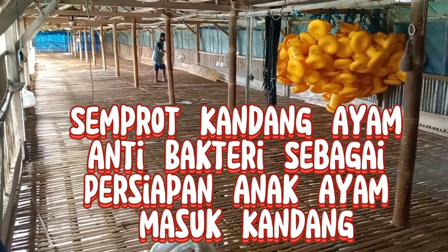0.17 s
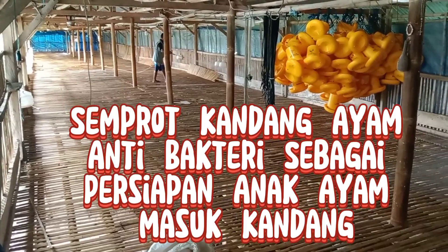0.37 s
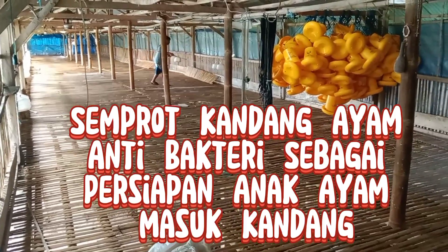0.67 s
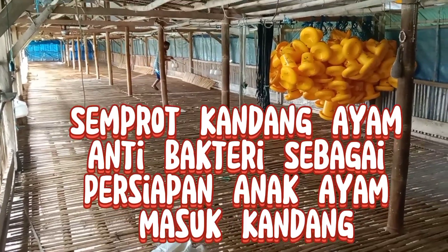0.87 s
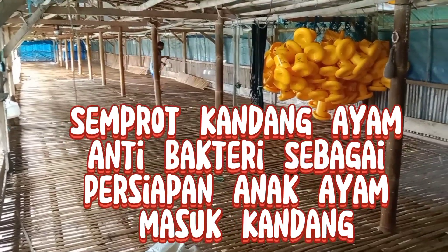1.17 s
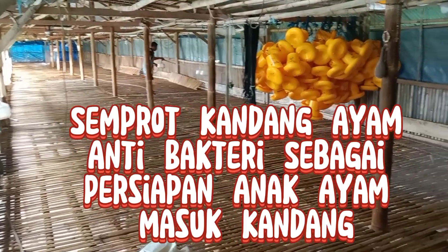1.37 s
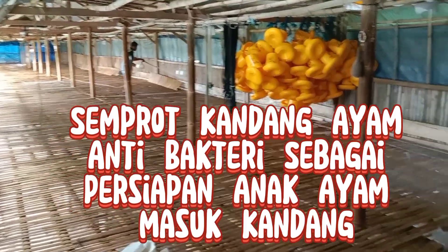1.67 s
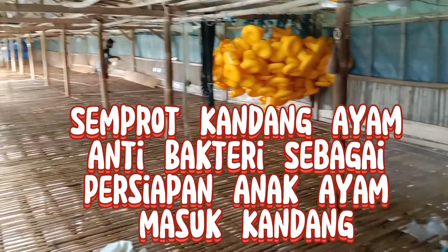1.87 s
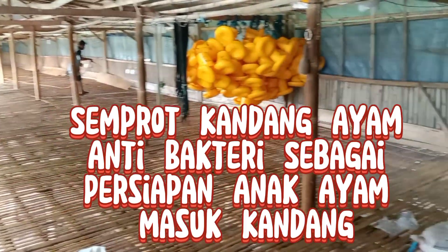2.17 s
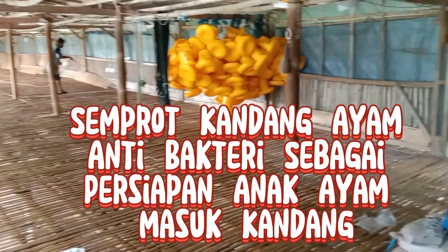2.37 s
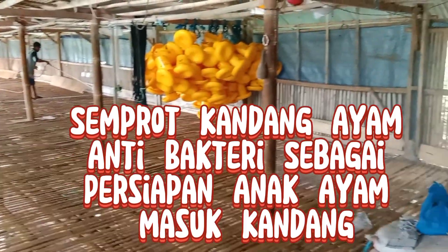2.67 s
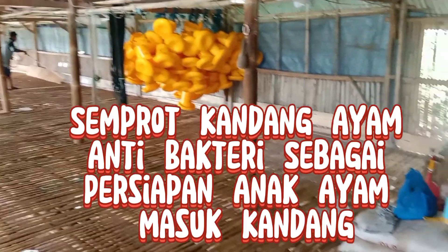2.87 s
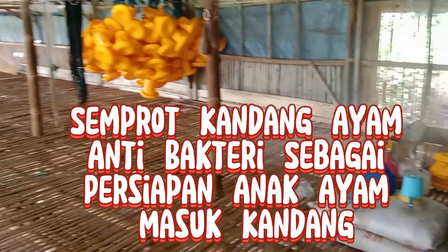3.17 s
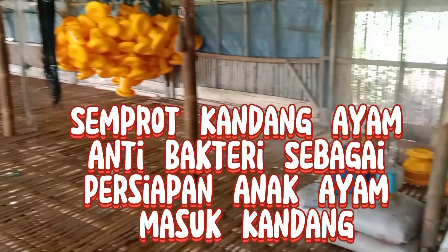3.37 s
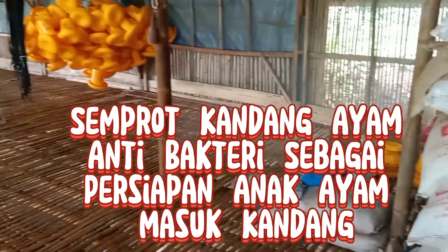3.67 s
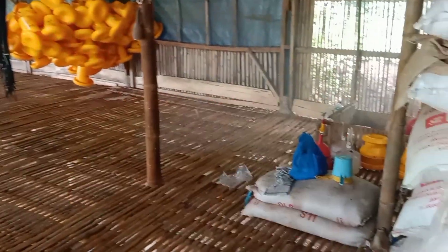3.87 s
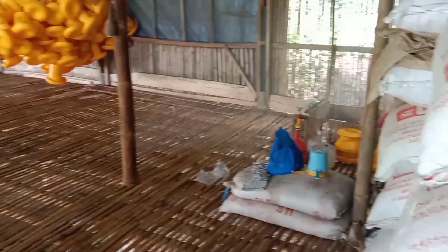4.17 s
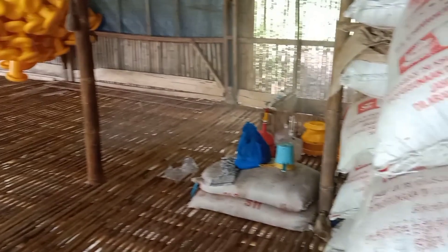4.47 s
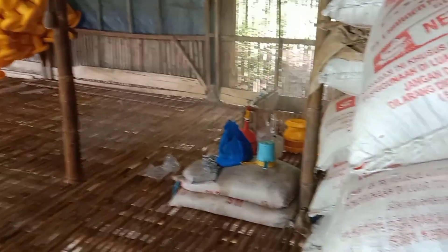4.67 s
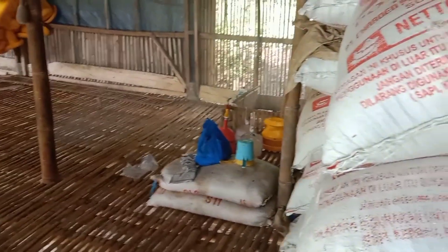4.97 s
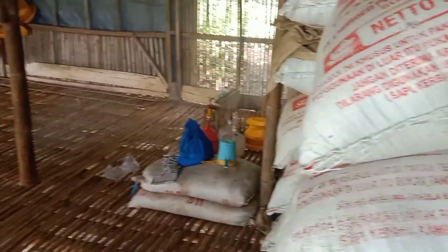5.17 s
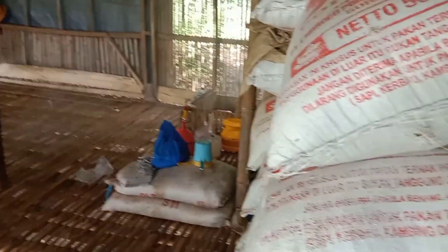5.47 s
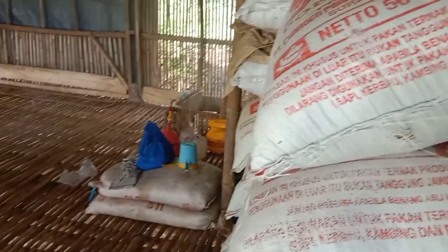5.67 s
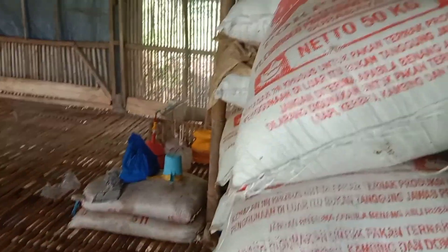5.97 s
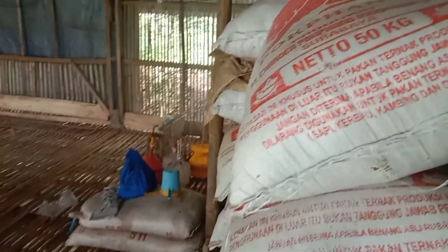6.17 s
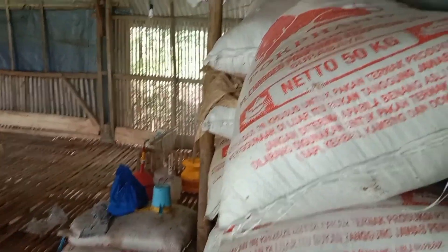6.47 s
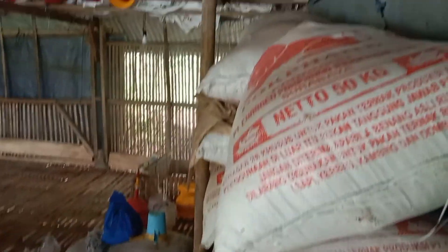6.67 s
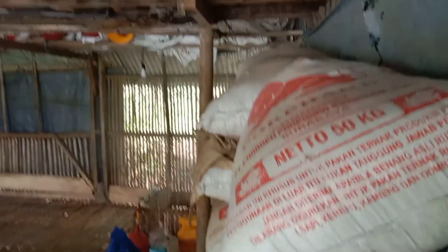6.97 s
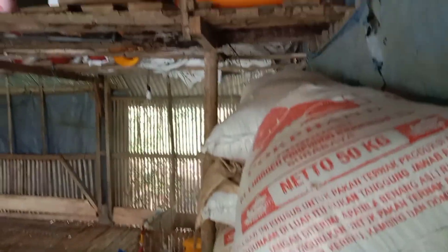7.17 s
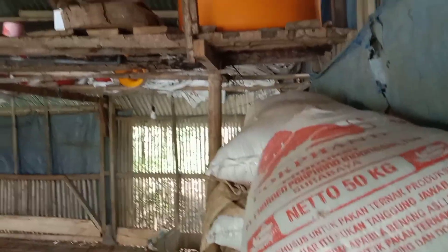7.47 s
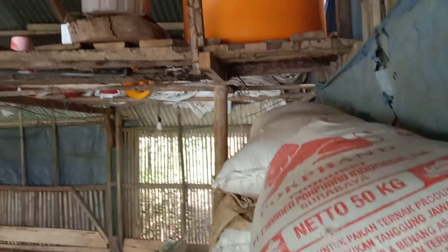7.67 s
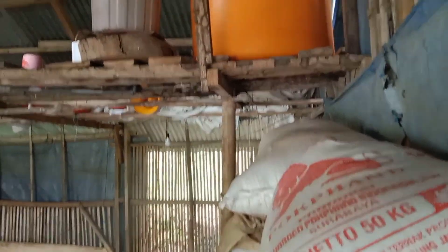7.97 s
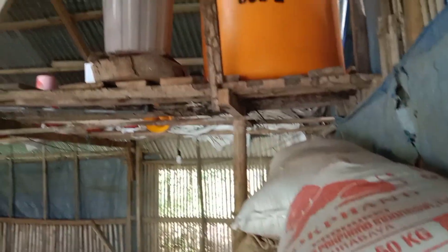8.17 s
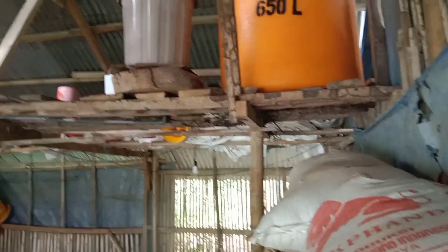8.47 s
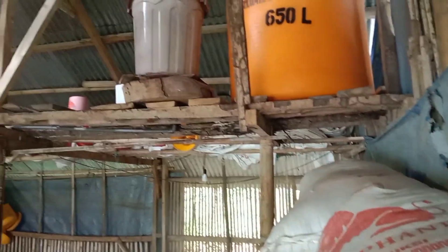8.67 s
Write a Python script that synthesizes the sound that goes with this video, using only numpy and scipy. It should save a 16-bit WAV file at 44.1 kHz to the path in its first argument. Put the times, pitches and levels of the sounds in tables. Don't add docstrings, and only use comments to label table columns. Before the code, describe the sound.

A continuous bright water hiss fills a phone's single microphone, spotted with irregular hollow gurgles as the spray crosses bamboo canes. Early on comes a brief grainy scrape of a plastic sack close by, with low slat creaks around it. Midway there are tiny sharp drop ticks, then one dull knock underfoot. The hiss turns mistier and the hollow notes weaken, over a barely audible rapid engine in an open shed with a short tail.

```python
import sys
import numpy as np
from scipy import signal
from scipy.fft import rfft, irfft, next_fast_len
from scipy.io import wavfile
from scipy.ndimage import uniform_filter1d, map_coordinates

SR = 44100
rng = np.random.default_rng(int(sys.argv[2]) if len(sys.argv) > 2 else 0)


def store_wav(level_fs):
    pcm = np.round(np.clip(np.atleast_2d(level_fs), -1, 1) * 32767)
    wavfile.write(sys.argv[1], SR, pcm.T.astype(np.int16))


def invert_db(x):
    u = np.asarray(x, float) / 20
    return 10 ** u


N = 388080

# time in seconds, hiss level in dB.
JET = [(0, -30.5), (.55, -29.5), (.86, -28), (1.15, -29.5), (1.5, -27), (1.68, -28), (1.92, -29.5),
       (2.15, -29), (3.1, -28.5), (3.55, -31), (3.85, -27), (4.2, -31), (4.9, -29), (6, -29.5), (6.5, -29),
       (7.4, -27), (8.8, -27)]
# start in seconds, length in seconds, hiss level in dB.
FLICKS = [
    (.582, 0.05, -30.5),
    (1.598, 0.012, -23),
    (1.64, 0.16, -32.5),
    (3.99, 0.024, -31),
]
# frequency in Hz, density in dB per Hz.
FAR_HISS = [(1150, -28), (2000, -19), (2270, -1.5), (2410, -0.5), (3010, 2), (3970, -12), (4580, 1),
            (5100, 0.5), (5850, -4), (6190, -22.5), (6740, -19), (7340, -69), (7600, -47), (9880, -62),
            (16700, -120)]
# frequency in Hz, density in dB per Hz.
NEAR_HISS = [(1150, -22), (2000, -25), (2290, -5), (3180, 0.5), (3610, -1), (3990, -9), (4740, -2.5),
             (5070, -0.5), (7600, -24.5), (9880, -59), (16700, -120)]
# time in seconds, share of the nearer hiss from 0 to 1.
TURN = [(3.3, 0.6), (4, 0.66), (6.5, 0.8), (7.6, 1)]
# frequency in Hz, density in dB per Hz.
MIST = [(6500, -32), (7400, -7.5), (8200, -1), (10000, 2), (10900, -5.5), (11800, -60), (14000, -37)]
# frequency in Hz, density in dB per Hz.
FINE = [(9500, -9), (11200, -4), (12500, -11), (14000, -21.5), (15500, -21)]
# start in seconds, length in seconds, level in dB re hiss.
DRIFTS = [(.565, .03, -39), (1.6, .05, -42), (1.93, .045, -35), (2.8, 0.27, -38), (3.72, .1, -35),
          (3.84, 0.08, -25), (3.98, .07, -25), (4.06, .06, -31), (4.2, 0.098, -26), (4.28, .09, -25),
          (4.46, .05, -27), (4.56, .2, -25), (4.85, .13, -26), (5.02, .21, -27), (5.28, 0.39, -26.5),
          (5.7, .06, -26), (5.8, .03, -28), (5.87, 0.23, -25.5), (6.13, 0.2, -26.5), (6.37, 0.3, -26),
          (6.72, 0.52, -26.5), (7.27, .11, -27), (7.42, 0.93, -25.5), (8.41, .33, -27), (8.78, .05, -27)]
# time in seconds, peak level in dB.
DROPS = [
    (3.8385, -30),
    (3.8415, -36),
    (4.0018, -44),
]

# start in seconds, length in seconds, level in dB, cavity note in Hz.
THICK = [(.198, 0.025, -36, 1050), (.44, 0.047, -47.5, 1050), (.622, 0.039, -33, 1048),
         (.84, 0.023, -29, 1027), (1.09, 0.035, -35.5, 960), (1.495, 0.065, -32, 1024),
         (1.71, 0.062, -33, 1069), (2.088, 0.12, -29.5, 1038), (2.37, 0.02, -31.5, 1043),
         (2.52, 0.044, -37, 1090), (2.72, 0.1, -41.5, 1095), (2.96, 0.036, -34.5, 1038),
         (3.172, 0.052, -32.5, 1038), (3.385, 0.083, -34, 1052), (3.608, 0.043, -27, 1060),
         (3.83, 0.07, -37.5, 1065), (4.412, 0.082, -40.5, 1083), (4.873, 0.03, -36.5, 1017),
         (5.07, 0.082, -35.5, 1048), (5.325, 0.034, -33.5, 1010), (5.51, 0.067, -29.5, 1040),
         (5.735, 0.089, -35.5, 1040), (6.12, 0.14, -36, 1092), (6.783, 0.065, -37.5, 1020),
         (7.0, 0.1, -46, 1052), (7.23, 0.054, -40, 1050), (7.415, 0.088, -34, 1040),
         (7.795, 0.077, -33, 1075), (8.072, 0.048, -43, 1096), (7.9, 0.082, -44.5, 960),
         (8.62, 0.062, -46, 980), (8.7, 0.1, -42, 1052),
         (0.707, 0.057, -40, 1095), (0.911, 0.13, -41, 1070), (1.052, 0.029, -36, 1105),
          (1.184, 0.048, -36, 1128), (1.591, 0.11, -34, 1145), (1.787, 0.023, -36.5, 1140),
          (1.853, 0.065, -36.5, 1153), (2.305, 0.045, -38.5, 1208), (3.094, 0.022, -37, 1166),
          (3.295, 0.049, -38.5, 1156), (3.53, 0.018, -31.5, 1134), (3.959, 0.054, -37, 1116),
          (4.072, 0.033, -40, 1166), (4.181, 0.14, -35.5, 1153), (4.647, 0.032, -36.5, 1153),
          (5.434, 0.056, -37, 1148), (6.017, 0.036, -50, 1224), (6.362, 0.05, -44, 1170),
          (6.457, .03, -46, 1160), (6.552, 0.026, -39, 1117), (7.597, .05, -48, 1140),
          (7.89, 0.057, -44.5, 1050), (8.231, 0.07, -42, 1086), (8.43, 0.051, -48, 1194)]
# frequency in Hz, gain in dB.
CANE_GAIN = [(780, -22), (850, -4), (930, -1.5), (1000, -1), (1400, -0.5)]
# start in seconds, length in seconds, level in dB, cavity note in Hz, glide in Hz per s.
THIN = [(0.43, 0.15, -52, 1414, -300), (.7, 0.084, -48, 1420, 2500), (.831, .06, -39.5, 1270, -200),
        (0.972, 0.046, -39.5, 1393, 1800), (1.17, 0.036, -40, 1420, 800), (1.49, 0.046, -44, 1380, -1500),
        (1.577, 0.15, -43.5, 1406, -200), (2.087, 0.035, -44, 1340, -1500),
        (2.269, 0.087, -46, 1334, -3000), (2.682, .1, -49, 1500, -1000), (3.08, .06, -48, 1384, 300),
        (3.18, .03, -46, 1380, -500), (3.29, 0.094, -46, 1322, 900), (3.519, .05, -40.5, 1290, 1500),
        (3.598, 0.13, -44, 1316, -900), (3.973, 0.067, -45.5, 1345, -800), (4.12, .14, -47, 1355, 900),
        (4.27, 0.094, -53.5, 1380, -900), (4.408, .05, -49, 1400, -800), (4.517, 0.068, -47, 1380, 500),
        (4.646, .07, -46, 1303, -2500), (4.79, .12, -42, 1423, -100), (5.004, .12, -45.5, 1412, -1800),
        (5.223, 0.053, -41, 1380, -400), (5.3, 0.21, -42.5, 1270, -500), (5.366, 0.055, -42.5, 1450, 2000),
        (5.709, 0.094, -43, 1414, -300), (5.925, 0.18, -48, 1317, -900), (6.15, 0.14, -43, 1290, 1500),
        (6.343, .033, -42, 1416, -200), (6.44, 0.088, -43, 1418, 2202), (6.55, .05, -50.5, 1325, -2000),
        (6.677, .035, -39.5, 1480, 2500), (6.755, .07, -47, 1400, -1800), (6.873, 0.063, -42.5, 1317, 1200),
        (7.06, .17, -46, 1386, -500), (7.34, .09, -43.5, 1360, -3000), (7.581, 0.028, -44, 1350, 500),
        (7.806, .1, -48, 1270, -1200), (8.304, 0.15, -53, 1310, -900)]
# start in seconds, length in seconds, level in dB, slat note in Hz.
SPLASHES = [(.1, 0.82, -48, 1592), (.835, 0.026, -38.5, 1810), (.9, 0.31, -44, 1663),
            (1.47, 0.31, -40.5, 1705), (1.8, 0.16, -47, 1620), (2.13, 0.044, -40.5, 1910),
            (2.22, .12, -45, 1720), (2.7, 0.06, -52, 1640), (3.18, 0.058, -46, 1790),
            (3.4, 0.098, -47, 2000), (3.59, 0.047, -43, 1850), (3.82, 0.08, -40.5, 1860),
            (3.98, 0.06, -47, 1650), (4.28, 0.051, -45, 1780), (4.55, 0.16, -44, 1695),
            (4.78, 0.14, -45, 1665), (4.98, .05, -47, 1566), (5.27, 0.11, -48, 1620),
            (5.5, 0.056, -41.5, 1940), (5.7, 0.095, -41.5, 1610), (6.0, 0.18, -49, 1576),
            (6.3, 0.04, -51, 1710), (6.45, 0.032, -47, 1830), (6.7, 0.083, -44, 1660),
            (7.0, 0.048, -49.5, 1790), (7.18, 0.085, -45.5, 1710), (7.44, 0.033, -48, 1820),
            (7.58, 0.14, -46, 1750), (7.79, 0.13, -39, 1720), (7.95, 0.31, -44.5, 1724),
            (8.36, 0.42, -46.5, 1720)]
# frequency in Hz, density in dB per Hz.
SLATS = [(1400, -7), (1560, -2.5), (1750, -4), (2000, -1), (2200, -2)]

# start in seconds, length in seconds, body level in dB, weave rasp level in dB.
STROKES = [
    (1.212, .015, -34.5, -32),
    (1.243, 0.012, -20.5, -17.5),
    (1.258, 0.02, -20.5, -15.5),
    (1.318, .01, -27, -27),
    (1.378, 0.027, -30, -32),
]
# frequency in Hz, density in dB per Hz.
SACK = [(88, -75), (150, -35.5), (310, -15.5), (754, -14.5), (1160, -4.5), (1280, -13), (1430, -13.5),
        (2000, -29), (2600, -39), (4400, -120)]
# frequency in Hz, density in dB per Hz.
WEAVE = [(880, -40), (1500, 3), (1630, -3.5), (2300, 1.5), (3060, 2.5), (3800, -8.5), (4870, 0.5),
         (5530, -6.5), (7240, -28.5), (10000, -40), (12500, -66), (19800, -120)]
# resonance in Hz, width in Hz, level in dB.
POCKETS = [(334, 40, -12), (538, 33, -9), (1010, 39, 8), (1140, 63, 0), (1480, 70, -6), (1750, 40, -7),
           (1940, 30, -8), (2120, 32, -17)]
# start in seconds, peak in dB, ring in Hz, rise in seconds, t60 in seconds.
CREAKS = [(0.099, -45, 401, 0.023, 0.25), (0.442, -37, 380, 0.017, 0.27), (0.949, -41, 428, 0.03, 0.3),
          (1.064, -38.5, 442, 0.034, 0.28), (1.147, -32, 460, 0.016, 0.19),
          (1.385, -26.5, 326, 0.017, 0.13), (1.535, -43, 430, 0.02, 0.15), (1.603, -38, 350, 0.013, 0.13),
          (1.745, -42, 467, 0.019, 0.16), (.72, -50, 800, 0.053, 0.57), (1.0, -47, 785, 0.034, 0.53),
          (1.5, -44, 804, .03, 0.33), (1.7, -45, 834, 0.047, 0.45), (.85, -46, 303, .02, 0.17),
          (3.984, -38, 406, 0.03, 0.19), (4.884, -38, 570, 0.006, 0.15), (4.95, -48, 600, 0.017, 0.18),
          (5.549, -46, 500, 0.027, 0.21), (7.419, -39, 780, 0.016, 0.15)]
# time in seconds, peak level in dB.
KNOCK = [
    (4.8774, -19),
]

# time in seconds, lead over a steady pace in firings.
LEAD = [(0, .33), (1.4, .345), (2, .355), (2.6, .385), (3.2, .4), (3.8, .358), (4.4, .285), (5, .232),
        (5.6, .266), (6.2, .195), (6.8, .239), (7.4, .234), (8, .304), (8.8, .22)]
# resonance in Hz, width in Hz, level in dB.
EXHAUST = [(68, 4.6, -11.5), (111.3, 25.3, 3), (135, 46, -2), (310, 120, -19)]
# frequency in Hz, density in dB per Hz.
AIR = [(25, -16), (60, -9), (150, -7.5), (250, -7.5), (500, -11), (850, -10), (1100, 1.5), (1500, -3.5),
       (2200, -16)]
# frequency in Hz, density in dB per Hz.
SELF = [(9000, -10), (11000, -4), (15500, 3)]


def spray():
    flick_db = swells(FLICKS, rise_db_s=800, fall_db_s=250)[0]
    hiss_db = 10 * np.log10(invert_db(2 * curves(JET)[0]) + invert_db(2 * flick_db))
    pump_db = 0.36 * np.cos(2 * np.pi * (crank() - 0.1))
    hiss_db = hiss_db + pump_db + 0.5 * wobble(25) + 0.17 * wobble(8)
    fine_db = swells(DRIFTS, rise_db_s=300, fall_db_s=250, rest_db=-44.5)[0]

    near = np.clip(curves(TURN)[0], 0, 1)
    hiss = np.sqrt(1 - near) * rush(FAR_HISS, patchy_db=1.1)
    hiss = hiss + np.sqrt(near) * rush(NEAR_HISS, patchy_db=0.9)

    far_mist_db, near_mist_db = -26.5, -22.5
    steady_db = far_mist_db + (near_mist_db - far_mist_db) * near
    cloud = np.hypot(invert_db(steady_db), invert_db(fine_db - 3))
    mist = cloud * rush(MIST, patchy_db=1.0)
    fine = invert_db(fine_db + 1.8 * wobble(20)) * rush(FINE, patchy_db=2.0)
    return invert_db(hiss_db) * (hiss + mist + fine) + drops()


def drops():
    out, t = np.zeros(N), np.arange(SR // 10) / SR
    for s, db in DROPS:
        tick = np.sin(2 * np.pi * 11000 * t + 1.1 * rng.standard_normal(len(t)))
        out[round(s * SR):][:len(t)] += invert_db(db - 3 - 60 * t / 0.012) * tick
    return out


def thick_canes():
    thick_db, thick_hz = swells(THICK, rise_db_s=1100, fall_db_s=476, rest_db=-60.5, rest_hz=1187,
                                sag_hz_s=394, droop_db_s=41)
    f, db = np.transpose(CANE_GAIN)
    low = gurgle(1.01 * thick_hz, count=1200, spread=0.041, cycles=23.5, fall=0.15)
    low = filtered(low, lambda hz: invert_db(np.interp(hz, f, db)))
    octave = gurgle(2.2 * thick_hz, count=1100, spread=0.076, cycles=36, fall=0.012)
    under = gurgle(0.52 * thick_hz, count=300, spread=0.019, cycles=23.2, fall=0.023)
    return invert_db(thick_db) * (low + invert_db(-7.5) * octave + invert_db(-33) * under)


def thin_canes():
    murmur_db = -56.5
    thin_db, thin_hz = swells(THIN, rise_db_s=450, fall_db_s=550, rest_db=murmur_db, rest_hz=1380,
                              sag_hz_s=-np.array(THIN)[:, -1:])
    thin_db = thin_db + 2.6 * wobble(14)
    looseness = invert_db(2 * (murmur_db - thin_db))
    thin_hz = thin_hz * np.exp(0.079 * looseness * wobble(7.7))
    tones = gurgle(thin_hz, count=600, spread=0.025, cycles=36, fall=0.033)

    splash_db, slat_hz = swells(SPLASHES, rise_db_s=348, fall_db_s=254, rest_db=-55, rest_hz=1613)
    slat_hz = slat_hz * np.exp(0.0472 * wobble(8))
    slats = gurgle(slat_hz, count=750, spread=0.021, cycles=44.3, fall=0.028)
    splash = invert_db(-3.0) * slats + invert_db(-1.5) * rush(SLATS, patchy_db=5)

    stroke_db = 1.7 * np.cos(2 * np.pi * (crank() - 0.15))
    return invert_db(stroke_db) * (invert_db(thin_db) * tones + invert_db(splash_db) * splash)


def gurgle(note_hz, count, spread, cycles, fall):
    start = ((np.arange(count) + rng.random(count)) * (N / count)).astype(int)
    steps = np.arange(int(1.15 * SR * cycles / note_hz.min()))
    hz = note_hz[np.minimum(start + len(steps) // 3, N - 1)]
    hz = hz * np.exp(spread * rng.standard_normal(count))
    u = np.float32(steps / SR) * np.float32(hz / cycles)[:, None]
    envelope = np.sin(np.pi * np.minimum(u, 1)) ** 2
    tone = envelope * np.sin(2 * np.pi * cycles * u * (1 + fall / 2 - fall * u / 2))
    places = start[:, None] + steps
    return unit(np.bincount(places.ravel(), tone.ravel(), N + SR)[:N])


def sack():
    s, length, body_peak, rasp_peak = np.transpose(STROKES)
    body_db = swells(np.transpose([s, length, body_peak]), rise_db_s=800, fall_db_s=172)[0]
    rasp_db = swells(np.transpose([s, length, rasp_peak]), rise_db_s=800, fall_db_s=118)[0]
    lift_s, lift_db_s = 1.47, 700
    lift = invert_db(-lift_db_s * np.maximum(np.arange(N) / SR - lift_s, 0))
    grain = unit(invert_db(0.89 * wobble(400)))

    def pockets(f):
        modes = sum(invert_db(db) * ring(f, c, w) for c, w, db in POCKETS)
        return modes * ring(f, 1160, 2200) / (1 + (f / 3500) ** 4)

    hollow = unit(filtered(rng.standard_normal(N), pockets))
    body = rush(SACK, patchy_db=4.5) + invert_db(-9.5) * hollow
    rasp = rush(WEAVE, patchy_db=3.0)
    return lift * grain * (invert_db(body_db) * body + invert_db(rasp_db) * rasp)


def floor():
    out, t = np.zeros(N + SR), np.arange(SR // 2) / SR
    wander = wobble(190) + 1j * wobble(190)
    for s, db, hz, rise, t60 in CREAKS:
        i = min(round(s * SR), N - len(t))
        shape = (1 - np.exp(-t / max(rise, 0.002))) * invert_db(db + 0.5 - 60 * t / max(t60, 0.02))
        creak = np.real(wander[i:i + len(t)] * np.exp(2j * np.pi * hz * t))
        out[round(s * SR):][:len(t)] += shape * creak
    for s, db in KNOCK:
        click = invert_db(-60 * t / 0.0068) * np.sin(2 * np.pi * 1250 * t)
        dull_noise = np.convolve(rng.standard_normal(len(t)), np.ones(24), "same")
        puff = invert_db(-38 - 60 * t / 0.057) * dull_noise
        thud = invert_db(-28 - 60 * t / 0.18) * (1 - np.exp(-t / 0.008)) * np.sin(2 * np.pi * 72 * t)
        out[round(s * SR):][:len(t)] += invert_db(db) * (click + puff + thud)
    return out[:N]


def engine():
    firing = np.diff(np.floor(crank() + 0.17), prepend=0) > 0
    puffs = firing * invert_db(2.2 * wobble(22))

    def exhaust(f):
        pipe = sum((-1) ** k * invert_db(db) * ring(f, c, w) for k, (c, w, db) in enumerate(EXHAUST))
        echo = invert_db(-6.0) * np.exp(-2j * np.pi * f * 0.0283) / (1 + 1j * f / 130)
        return pipe * ring(f, 91, 150) * (1 + echo)

    thump = unit(filtered(puffs, exhaust))
    chuff = invert_db(1.1 * np.cos(2 * np.pi * (crank() - 0.06)))
    return invert_db(-56.5) * thump + invert_db(-52.5) * chuff * rush(AIR, patchy_db=-0.5)


def crank():
    return 13.7 * np.arange(N) / SR + curves(LEAD)[0]


def shed(x):
    tail = invert_db(-60 * np.arange(SR // 3) / SR / 0.48) * rng.standard_normal(SR // 3)
    return x + invert_db(-9) * signal.fftconvolve(x, tail / np.linalg.norm(tail))[:N]


def rush(spectrum, patchy_db):
    z = signal.stft(rng.standard_normal(N), nperseg=512)[2]
    field = uniform_filter1d(rng.standard_normal(z.shape), size=6, axis=0)
    field = uniform_filter1d(field, size=10, axis=1)
    noise = signal.istft(z * invert_db(patchy_db * unit(field)), nperseg=512)[1][:N]
    f, db = np.transpose(spectrum)
    return unit(filtered(noise, lambda hz: invert_db(np.interp(np.log(hz + 1), np.log(f), db, -120, -120))))


def swells(rows, rise_db_s, fall_db_s, rest_db=-120, rest_hz=0, sag_hz_s=0, droop_db_s=0):
    t = np.arange(N // 44 + 2) * 44 / SR
    s, length, db, *hz = np.transpose(rows)[:, :, None]
    droop = droop_db_s * np.clip(t - s, 0, length)
    slope = np.maximum(rise_db_s * (s - t), fall_db_s * (t - s - length))
    power = invert_db(2 * (db - droop - np.maximum(slope, 0)))
    total = power.sum(axis=0) + invert_db(2 * rest_db)
    note = hz[0] - sag_hz_s * np.clip(t - s - length / 2, -length, length) if hz else 0
    mean_hz = ((power * note).sum(axis=0) + invert_db(2 * rest_db) * rest_hz) / total
    return curves(np.transpose([t, 10 * np.log10(total), mean_hz]))


def ring(f, c, w):
    return 1j * f * w / (c * c - f * f + 1j * f * w)


def filtered(x, response):
    m = next_fast_len(N + SR // 2)
    return irfft(rfft(x, m) * response(np.fft.rfftfreq(m, 1 / SR)), m)[:N]


def wobble(rate):
    knots = rng.standard_normal(int(N * rate / SR) + 4)
    return map_coordinates(knots, [np.arange(N) * rate / SR])


def curves(rows):
    s, *cols = np.transpose(rows)
    return [np.interp(np.arange(N) / SR, s, c) for c in cols]


def unit(x):
    return x / np.sqrt(np.mean(np.abs(x) ** 2) + 1e-20)


def scene():
    canes = shed(thick_canes() + thin_canes())
    mono = spray() + canes + sack() + floor() + engine()
    return np.array([mono, mono])


def low_pass(x):
    return signal.sosfilt(signal.butter(12, 15400, fs=SR, output="sos"), x)


def record(dry):
    def colour(f):
        notch = 1 - 0.64 * np.exp(-((f - 7350) / 200) ** 2) - 0.26 * np.exp(-((f - 6180) / 120) ** 2)
        bass_cut = (1j * f / (30 + 1j * f)) ** 2
        return notch * bass_cut * (f < 15460)

    heard = filtered(dry[0] + invert_db(-76) * rush(SELF, patchy_db=1.1), colour)
    return low_pass(np.array([heard, heard]))


dry = scene()
out = record(dry)
store_wav(out)
```